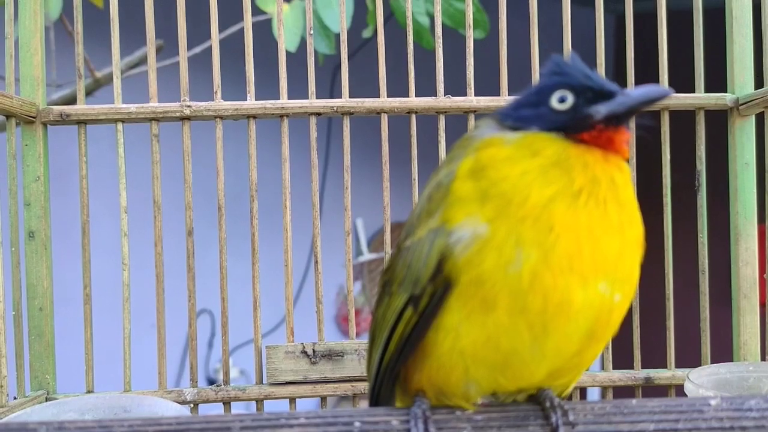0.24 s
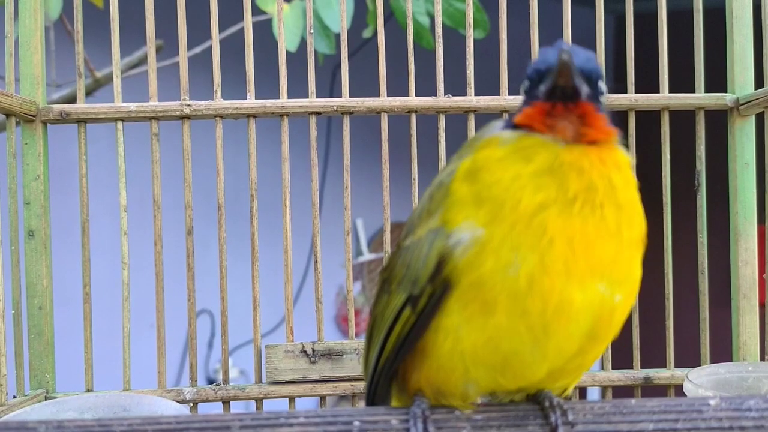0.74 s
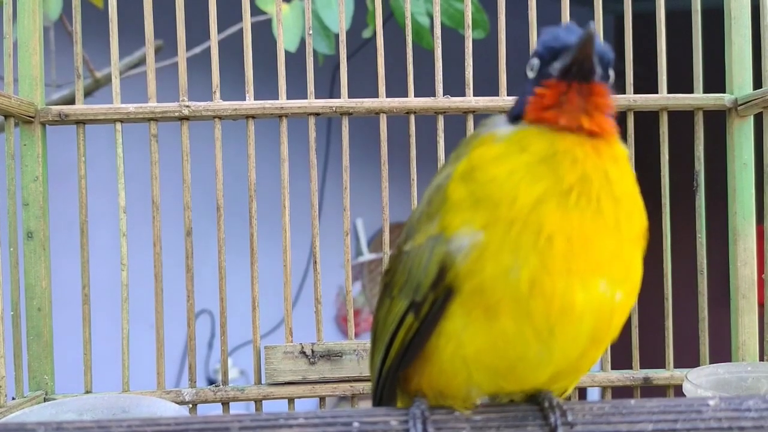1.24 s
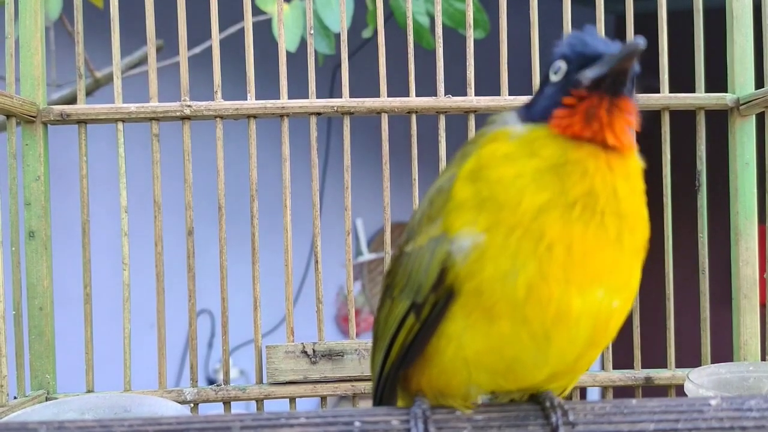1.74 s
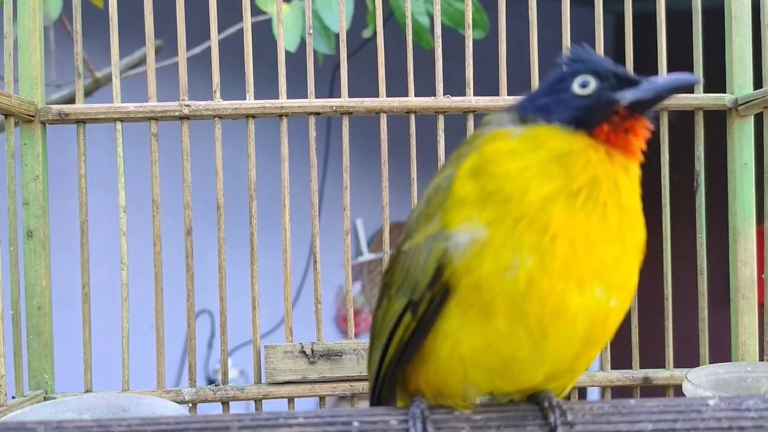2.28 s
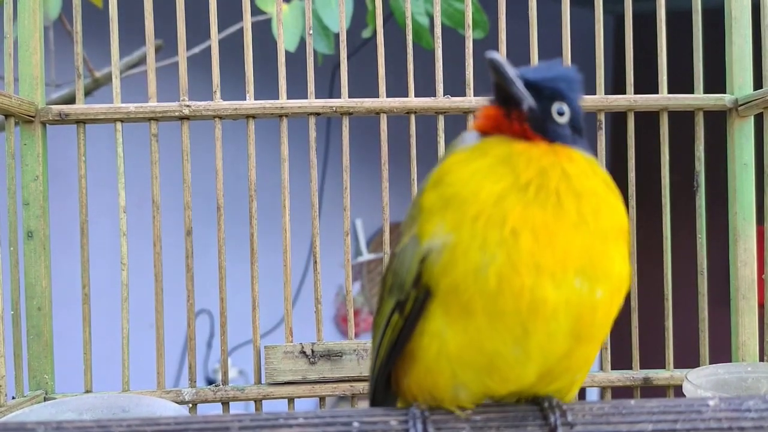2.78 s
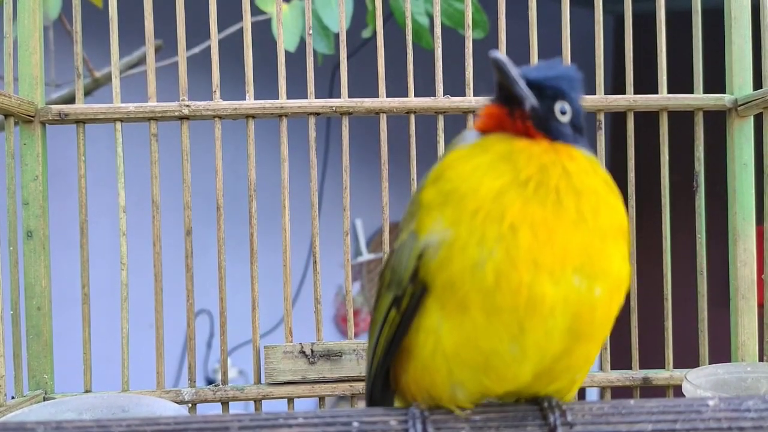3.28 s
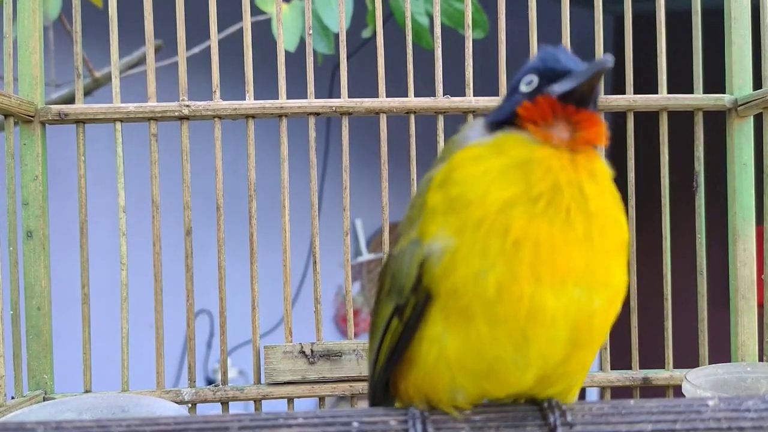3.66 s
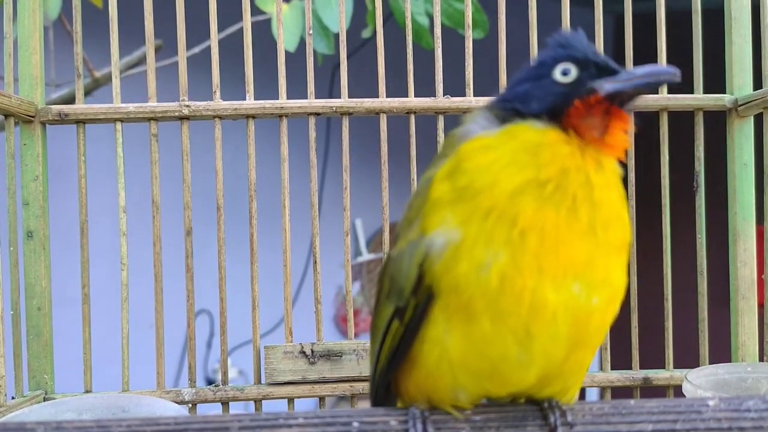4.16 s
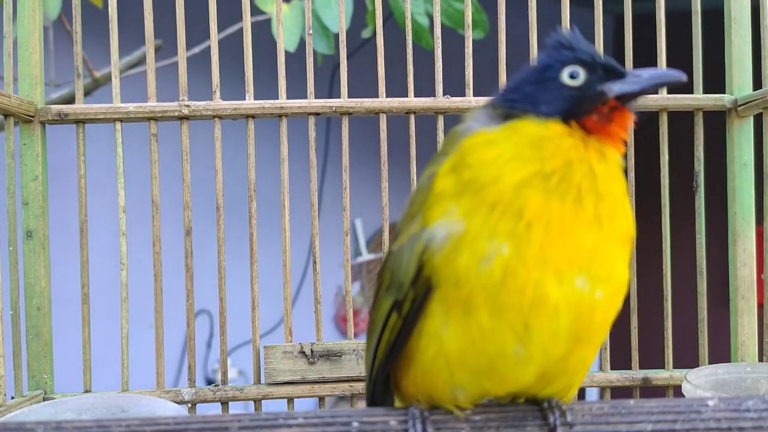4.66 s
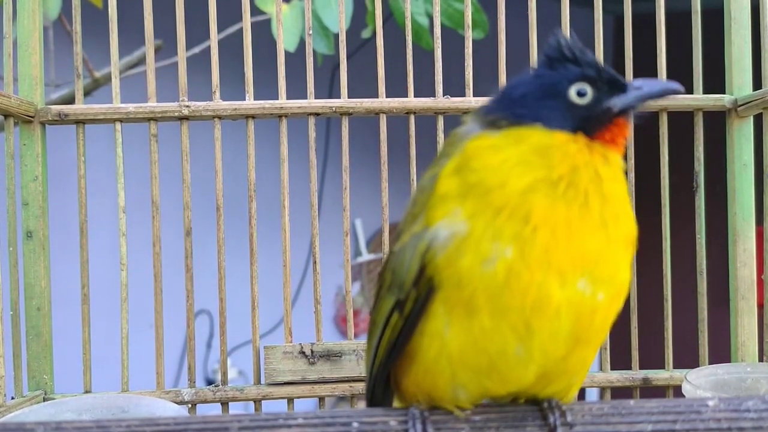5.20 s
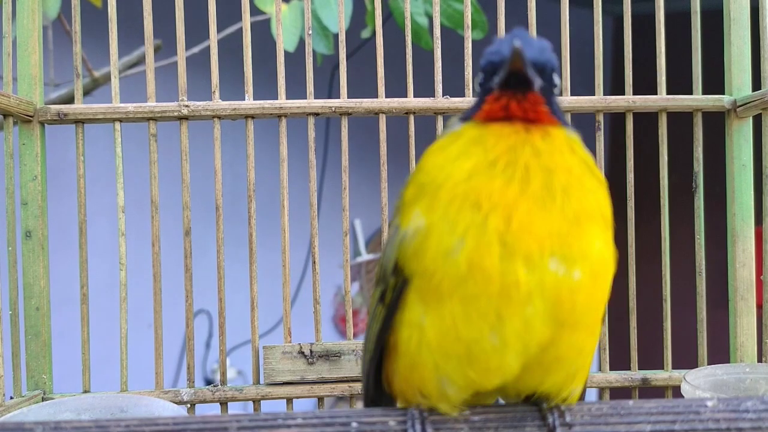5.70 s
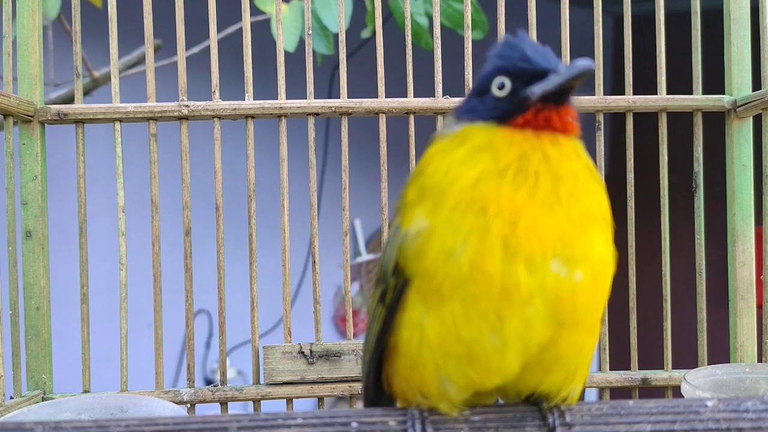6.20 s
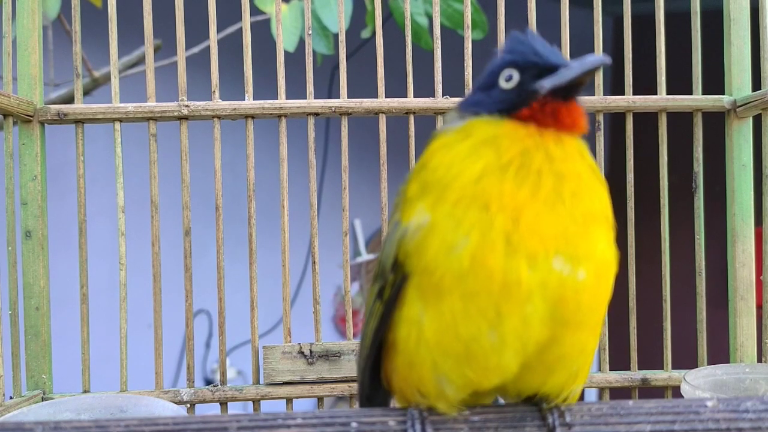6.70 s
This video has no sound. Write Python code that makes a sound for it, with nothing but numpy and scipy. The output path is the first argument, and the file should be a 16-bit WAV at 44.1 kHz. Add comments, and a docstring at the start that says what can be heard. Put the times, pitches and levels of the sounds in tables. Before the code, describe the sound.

Bright, pure bird whistles burst out in two short matching phrases, with low distant traffic between them and a sharp, clipped new start at the end.

```python
"""Caged bulbul, close up

A bulbul in a cane cage sings two quick phrases of chips, a slur, a pip, a long whistle and loud twirls,
then starts a third with a squeak and two yelps. Each note is a nearly pure gliding whistle with faint
overtones, a scratchy onset, patchy noise that follows its level, and a short echo from the walls.
Swells of filtered noise make soft feather rustles, traffic, far-off hums and hiss; the perch taps once."""
import sys
import numpy as np
from scipy import signal
from scipy.fft import rfft, irfft, next_fast_len
from scipy.io import wavfile
from scipy.ndimage import uniform_filter1d

SR = 44100
rng = np.random.default_rng(int(sys.argv[2]) if len(sys.argv) > 2 else 0)


def unload_wav(signal):
    """Save mono or channel-first audio to the path in sys.argv[1] as 16-bit WAV at rate SR, clipped to [-1, 1]."""
    wavfile.write(
        sys.argv[1],
        SR,
        np.round(np.clip(np.atleast_2d(signal).T, -1, 1) * 32767).astype(np.int16),
    )


N = 306054
TIME = np.arange(N) / SR   # s


def from_db(db):
    """Decibels to amplitude gain."""
    return 10 ** (np.asarray(db) / 20)


def rms_one(x):
    """Scale to unit power."""
    return x / np.sqrt(np.mean(x ** 2) + 1e-20)


def over_time(points):
    """Draw a curve through (time, value) breakpoints."""
    return np.interp(TIME, *np.transpose(points))


def at_hz(points, hz):
    """Read a (frequency, value) curve on a log-frequency axis."""
    f, value = np.transpose(points)
    return np.interp(np.log(np.maximum(hz, 1)), np.log(f), value)


def colour(x, gain_at):
    """Filter by a gain that is a function of frequency."""
    length = x.shape[-1]
    size = next_fast_len(length + 4096)
    hz = np.arange(size // 2 + 1) * SR / size
    return irfft(rfft(x, size) * gain_at(hz), size)[..., :length]


def flutter(rate_hz):
    """Random wander, mostly slower than the given rate; spread 1."""
    return rms_one(colour(rng.standard_normal(N), lambda hz: 1 / (1 + (hz / rate_hz) ** 2)))


def hiss(spectrum):
    """Mono noise of the given colour at unit power."""
    return rms_one(colour(rng.standard_normal(N), lambda hz: from_db(at_hz(spectrum, hz))))


def patchy(x, depth_db, size=1024):
    """Narrow bands swell and fade slowly, each wandering nearly on its own."""
    bins = signal.stft(x, nperseg=size)[2]
    field = uniform_filter1d(rng.standard_normal(bins.shape[-2:]), size=3, axis=0)   # across frequency
    field = rms_one(uniform_filter1d(field, size=30, axis=1))   # across time
    return signal.istft(bins * from_db(depth_db * field), nperseg=size)[1][..., :x.shape[-1]]


# How alike the two ears are: (frequency [Hz], left-right correlation [-1 to 1])
EAR_LIKENESS = [(30, 1), (100, .97), (200, 0.94), (350, 0.57), (700, 0.0044), (1500, 0.16), (16000, 0.02)]


def likeness(hz):
    """Left-right correlation of background noise at a frequency."""
    return np.clip(at_hz(EAR_LIKENESS, hz), -.99, .99)


def ambience(spectrum):
    """Coloured stereo noise from a shared part and an opposed part, alike in both ears in the bass."""
    mid, side = rng.standard_normal((2, N))
    mid = colour(mid, lambda hz: from_db(at_hz(spectrum, hz)) * np.sqrt(1 + likeness(hz)))
    side = colour(side, lambda hz: from_db(at_hz(spectrum, hz)) * np.sqrt(1 - likeness(hz)))
    return np.array([mid + side, mid - side])


def swells(rows, grain_db):
    """Bell-shaped swells of noise, each around one frequency; low ones are alike in both ears."""
    out = np.zeros((2, N))
    for centre_s, half_s, centre_hz, octaves, db in rows:
        on = np.abs(TIME - centre_s) < 3 * half_s
        band = lambda hz: 1 / (1 + (np.log2((hz + 1) / centre_hz) / octaves) ** 2) ** 2
        mid, side = colour(rng.standard_normal((2, N))[:, on], band)
        alike = likeness(centre_hz)
        noise = rms_one(np.sqrt(1 + alike) * mid + np.sqrt(1 - alike) * side * [[1], [-1]])
        bell = np.exp(-((TIME[on] - centre_s) / half_s) ** 2)
        out[:, on] += from_db(db) * noise * bell
    return out * from_db(grain_db * flutter(60))


# Colour of the surrounding hiss: (frequency [Hz], relative level [dB])
AIR_COLOUR = [(400, -7), (800, -4.5), (1050, 1), (1400, -3), (2000, -12.5), (3000, -21), (4500, -26.5),
              (8000, -25.5), (11000, -33), (15500, -32.5)]
# Its loudness: (time [s], level [dB])
AIR_LEVEL = [(0, -59.5), (2.2, -64), (3.2, -64.5), (4.8, -63), (5.7, -67.5), (6.94, -63.5)]


def air():
    """Faint hiss of the surroundings: stereo noise whose narrow bands waver."""
    return from_db(over_time(AIR_LEVEL)) * rms_one(patchy(ambience(AIR_COLOUR), depth_db=6.5))


# Faint hums and tones: (time [s], half length [s], centre [Hz], width [octaves], peak level before grain [dB])
FAR_HUMS = [(.35, 0.32, 1660, .03, -66), (.6, .9, 93, 0.06, -51.5), (6.4, 0.5, 90.3, 0.038, -50.5),
            (1.2, .9, 349.7, .05, -48), (1.7, 0.67, 244.6, .03, -50), (2.3, 0.071, 987, 0.015, -54.5),
            (2.95, .45, 1512, .06, -67), (3.3, 1.4, 554.6, 0.059, -58.5), (5.2, 0.32, 1262, 0.12, -65.5),
            (5.4, 0.29, 2740, .12, -74), (6.58, 0.25, 3400, 0.0295, -76.5)]


def far_tones():
    """Far-off hums and tones as swells of narrow-band noise."""
    return swells(FAR_HUMS, grain_db=1.0)


# Nearer traffic: (time [s], engine level before trim [dB], tyre level before trim [dB])
TRAFFIC_LEVEL = [(0, -42.5, -50.5), (2.2, -41, -49.5), (2.9, -50, -58.5), (3.7, -42, -58.5),
                 (4.7, -43.5, -57.5), (5.3, -37, -59), (5.74, -46, -67.5), (5.86, -59, -69),
                 (6.6, -62, -70.5), (6.94, -55.5, -65)]
# Colour inside the traffic bands: (frequency [Hz], relative level [dB])
TRAFFIC_TONE = [(20, -29.5), (35, -19.5), (60, -9.5), (88, 0), (130, -1), (190, -4.5), (250, -3.5),
                (340, -11), (440, -20.5), (560, -16), (680, -19.5), (850, -34), (1100, -36)]


def traffic(rumble_db=-44.5, engine_trim_db=-1.15, tyre_trim_db=0.5):
    """A steady low town rumble, with engine and tyre noise that swell and fade above it."""
    time_s, engine_db, tyre_db = np.transpose(TRAFFIC_LEVEL)
    engine = np.interp(TIME, time_s, engine_db) + engine_trim_db
    tyres = np.interp(TIME, time_s, tyre_db) + tyre_trim_db
    noise, out = ambience(TRAFFIC_TONE), 0
    for band_hz, db in [((15, 140), rumble_db), ((140, 400), engine), ((400, 900), tyres)]:
        bandpass = signal.butter(4, band_hz, "band", fs=SR, output="sos")
        part = signal.sosfiltfilt(bandpass, noise, padtype="even")
        out = out + rms_one(part) * from_db(db)
    return out


# Feather rustles and other soft swells of hiss:
# (time [s], half length [s], centre [Hz], width [octaves], peak level before grain and patchiness [dB])
FEATHER_RUSTLES = [(.66, 0.11, 8000, .21, -68.5), (.84, 0.04, 4440, 0.044, -32), (.86, .09, 8050, .39, -54),
                   (.96, .12, 4257, 0.021, -51), (.94, 0.12, 4940, .09, -44.5),
                   (1.02, 0.11, 6260, 0.071, -52.5), (3.08, 0.1, 4160, 0.68, -77.5),
                   (4.07, .054, 3890, .83, -46), (4.683, .14, 8000, 0.086, -72),
                   (5.821, 0.12, 7800, 0.44, -65), (5.976, .2, 6830, .6, -68), (5.9, .22, 2870, 1, -68.5),
                   (6.545, 0.081, 5500, .7, -70.5), (6.56, .08, 2090, 0.59, -64)]


def feathers():
    """Feathers rustle as the bird moves: grainy, patchy swells of band-limited noise."""
    return patchy(swells(FEATHER_RUSTLES, grain_db=1.5), depth_db=3.5)


def perch(tap_s=5.776, onset_db=-47, decay_s=0.0044, corner_hz=700):
    """One soft, dull tap of decaying low noise as the bird shifts on its perch."""
    since = TIME - tap_s
    thud = rms_one(colour(rng.standard_normal(N), lambda hz: 1 / (1 + (hz / corner_hz) ** 2)))
    return from_db(onset_db) * thud * (since > 0) * np.exp(-np.abs(since) / decay_s)


# Distinct echoes off nearby walls: (delay [s], level before wall colour [dB])
WALL_ECHOES = [(0.0127, -31.5), (.0172, -34)]
# Colour of all the echoes: (frequency [Hz], gain [dB])
WALL_COLOUR = [(1000, 4), (2200, 4), (3200, 4.5), (3800, 5.5), (4600, 3), (6000, 6.5), (9000, 7),
               (15000, 1)]


def walls(x, near_db=-27, near_t60=.14, far_db=-35, far_t60=0.64, gap_s=0.001):
    """Two distinct echoes, dense early reflections and a fainter, longer tail; decay times in s."""
    t = np.arange(SR) / SR
    response = 0
    for db, t60 in (near_db, near_t60), (far_db, far_t60):
        fade_in = np.clip(t / gap_s - 1, 0, 1)   # silent during the gap
        echoes = rng.standard_normal((2, SR)) * from_db(-60 * t / t60) * fade_in
        response = response + from_db(db) * rms_one(echoes) / np.sqrt(SR)
    for delay_s, db in WALL_ECHOES:
        response[:, int(delay_s * SR)] += from_db(db)
    response = colour(response, lambda hz: from_db(at_hz(WALL_COLOUR, hz)))
    return signal.fftconvolve(x[None], response, axes=1)[:, :N]


def sing(shape, rows, flick_share=.22):
    """Stretch, transpose and swell one gesture per row into (time s, Hz, dB) paths; the end flicks."""
    share, hz, db = np.transpose(shape)
    closing = np.clip(1 - (1 - share) / flick_share, 0, 1)   # the pitch bend grows over the last part
    notes = []
    for start_s, length_s, semitones, level_db, crescendo_db, flick in rows:
        time_s = start_s + length_s * share
        pitch_hz = hz * 2 ** ((semitones + flick * closing) / 12)
        note_db = db + level_db + crescendo_db * (share - .5)
        notes.append(np.transpose([time_s, pitch_hz, note_db]))
    return notes


# Overtones 2 to 6 against the fundamental, before the trims below: (level [dB])
OVERTONE_LEVELS = [-33, -39, -42, -47, -54.5]
# Extra level of the octave overtone: (time [s], gain [dB])
OCTAVE_GAIN = [(.8, -3.5), (1.2, -3), (1.7, -3), (3.5, 1.5), (3.8, 7.5), (4.0, -0.5), (4.4, -1.5), (6.9, 5)]
# How throat and open beak colour the overtones: (frequency [Hz], gain [dB])
BEAK_COLOUR = [(4000, -1), (5500, -2), (7000, -2.5), (8300, 11), (9500, -2), (11000, -3.5), (12200, -3),
               (14000, 6), (16000, -2.5)]
# Patchy noise around the notes: (frequency [Hz], relative level [dB])
HALO_COLOUR = [(700, -7), (1200, 6), (1800, 1.5), (2600, 10), (4000, 11), (6000, -3.5), (7000, -5.5),
               (8500, 0), (11000, -13.5), (14500, -5), (16000, -10.5)]
# Scratch before the tone locks in: (frequency [Hz], relative level [dB])
SCRATCH_COLOUR = [(600, -35.5), (1200, 3.5), (1900, 3.5), (3000, -2), (4500, -23.5), (9000, -27),
                  (15000, -37.5)]


def syrinx(notes, overtone_db, halo_db, scratch_db, scratch_s=.004, edge_s=0.0012,
           jitter=.003, shimmer_db=0.56, half_db=-40, waver_db=2.5):
    """One oscillator glides through each note, with a scratch at its start and a halo of patchy noise."""
    pitch, level, start = np.full(N, 2500.), np.zeros(N), np.zeros(N)
    for note in notes:
        s, hz, db = np.transpose(note)
        on = slice(*np.searchsorted(TIME, [s[0] - 3 * scratch_s, s[-1] + 2 * edge_s]))
        t = TIME[on]
        gate = np.clip(np.minimum(t - s[0], s[-1] - t) / edge_s + 1, 0, 1)
        pitch[on] = np.interp(t, s, hz)
        level[on] = gate * from_db(np.interp(t, s, db))
        start[on] = np.exp(-((t - s[0]) / scratch_s) ** 2)
    # smooth the corners, then add small random pitch and level wander
    pitch = uniform_filter1d(pitch, size=40) * (1 + jitter * flutter(360))
    level = np.abs(uniform_filter1d(level, size=30)) * from_db(shimmer_db * flutter(100))

    phase = 2 * np.pi * np.cumsum(pitch) / SR
    tone = np.sin(phase) + from_db(half_db) * np.sin(phase / 2)   # alternate cycles differ slightly
    singing = level > 1e-5
    for k, db in enumerate(OVERTONE_LEVELS, 2):
        hz = k * pitch[singing]
        waver = from_db(overtone_db + waver_db * flutter(30))[singing]
        if k == 2:
            db = db + over_time(OCTAVE_GAIN)[singing]
        gain = from_db(db + at_hz(BEAK_COLOUR, hz)) * waver
        tone[singing] += gain * np.sin(k * phase[singing]) * (hz < SR / 2)

    follow = level ** .6 * (pitch / 3000) ** .8   # the noise is stronger on loud, high notes
    halo = from_db(halo_db) * follow * patchy(hiss(HALO_COLOUR), depth_db=8, size=256)
    scratch = from_db(scratch_db) * start * hiss(SCRATCH_COLOUR)
    return np.sqrt(2) * level * tone + halo + scratch


# Gesture of each kind of note: (share of its length [0-1], pitch [Hz], level [dB]),
# before each sung note's transposition and level
CHIP_GESTURE = [(0.0, 2193, -18.5), (0.057, 2020, -3), (0.189, 2950, -0.17), (0.669, 3358, -0.35),
                (1.0, 3563, -23)]
SLUR_GESTURE = [(0.0, 2281, -17), (0.035, 2148, -0.6), (0.063, 2716, -4.5), (0.464, 2450, 0.3),
                (0.668, 2732, -2.5), (0.823, 2767, 2), (0.942, 2760, 0.5), (1.0, 2600, -16.5)]
PIP_GESTURE = [(0.0, 2410, -22), (0.093, 3363, -17), (0.46, 3493, 0.16), (0.807, 3563, -2.34),
               (1.0, 3410, -22.5)]
WHISTLE_GESTURE = [(0, 2260, -20.5), (.047, 2870, 0), (.228, 2535, -3), (.52, 2411, 2), (.61, 2280, 0.6),
                   (.71, 2240, 1.1), (.84, 2205, 2), (.935, 2274, 0.5), (1, 2373, -23.5)]
TWIRL_GESTURE = [(0, 2313, -22.5), (.08, 3018, -6.5), (.21, 3001, -0.7), (.335, 3316, -1.4),
                 (.4, 2340, -11), (.46, 2030, -14), (.61, 2175, -11.5), (.69, 3430, 0), (.73, 3828, -8.5),
                 (.785, 3770, -6), (.88, 4576, -8.5), (1, 4977, -27.5)]
SQUEAK_GESTURE = [(0, 3700, -27.5), (.22, 2900, -10.5), (.68, 2170, 1), (1, 1750, -7)]
YELP_GESTURE = [(0.0, 2060, -12.5), (0.205, 2858, -8.5), (0.332, 3130, -1.5), (0.707, 2939, -2.1),
                (1.0, 2548, -17)]
# Notes sung: (start [s], length [s], transposition [semitones], level added to the gesture [dB],
# crescendo from start to end [dB], closing flick [semitones])
CHIP_NOTES = [(0.7406, 0.033, -0.073, -14, 1.27, -0.1), (0.823, 0.037, -0.08, -13.0, -2.5, -0.28),
              (3.483, 0.0347, 0.37, -15, 2, 0.1), (3.5683, 0.034, 0.076, -14.5, -11, -1.43)]
SLUR_NOTES = [(0.9037, 0.0976, -0.12, -11.5, 0.5, 0.2), (3.647, 0.11, 0.097, -11.5, -1.5, -0.7)]
PIP_NOTES = [(1.055, 0.0402, 0.1, -8.5, 4, 0.97), (3.813, 0.0419, 0.05, -11.5, -2.5, -0.9)]
WHISTLE_NOTES = [(1.1336, .131, -.1, -7.5, -2.9, .1), (3.8952, .139, .05, -8.5, 3, 3.4)]
TWIRL_NOTES = [(1.4372, 0.056, -.15, -1.26, 2, -0.7), (1.5321, 0.058, .11, -2.2, -2, 1.5),
               (1.6344, .057, .28, -6, -0.8, 1.8), (4.1486, .0585, -.1, -6, -1.5, 0),
               (4.244, 0.06, .4, -6, -5.5, -0.94), (4.3446, .06, .45, -4.5, 1, -2.6),
               (4.452, .059, -.45, -8.5, 2, 1)]
SQUEAK_NOTES = [(6.8485, .0185, .05, -13.5, -2, .1)]
YELP_NOTES = [(6.8837, 0.017, 0.2, -4.5, -4, 0.26), (6.9172, 0.018, 0.18, 0.18, 1, 2.3)]
# The head's aim: (time [s], left gain against right, before shading [dB])
HEAD_AIM = [(.75, -3.5), (.85, -4.5), (.95, -3), (1.2, -2.5), (1.55, -2.5), (3.5, -3), (3.7, -5.5),
            (3.84, -2), (4.0, -4.5), (4.45, -3.5), (6.92, -3.5)]
# Shading of the far, left side: (frequency [Hz], gain [dB])
LEFT_SHADE = [(1000, -4.5), (1600, -4.5), (2300, -1), (2750, -10.5), (3150, -1), (3600, -4.5),
              (4000, -14.5), (4600, -2.5), (5500, 3), (7000, -15), (8200, -26.5), (11000, -15),
              (15000, -7.5)]


def bird(left_lag_s=.000306, yelp_echo_db=7):
    """The bird sits to the right: the left side hears it later and shaded. The yelps stir more echo."""
    opening_notes = sing(CHIP_GESTURE, CHIP_NOTES) + sing(SLUR_GESTURE, SLUR_NOTES)
    opening_notes += sing(PIP_GESTURE, PIP_NOTES) + sing(WHISTLE_GESTURE, WHISTLE_NOTES)
    twirl_notes = sing(TWIRL_GESTURE, TWIRL_NOTES)
    yelp_notes = sing(SQUEAK_GESTURE, SQUEAK_NOTES) + sing(YELP_GESTURE, YELP_NOTES)

    opening = syrinx(opening_notes, overtone_db=3, halo_db=-48.5, scratch_db=-30.5, scratch_s=0.0046)
    twirls = syrinx(twirl_notes, overtone_db=-5.5, halo_db=-31, scratch_db=-34)
    yelps = syrinx(yelp_notes, overtone_db=-6.5, halo_db=-33, scratch_db=-32)

    song = opening + twirls + yelps
    lag = lambda hz: np.exp(-2j * np.pi * hz * left_lag_s)
    left = colour(song, lambda hz: from_db(at_hz(LEFT_SHADE, hz)) * lag(hz))
    left *= from_db(over_time(HEAD_AIM))
    return np.array([left, song]) + walls(opening + twirls + from_db(yelp_echo_db) * yelps)


def scene():
    """Layer the hiss, hums, traffic, feathers and perch under the bird."""
    return air() + far_tones() + traffic() + feathers() + perch() + bird()


def record(dry, ceiling=0.98, cutoff_hz=16000):
    """The loudest notes overload the near microphone and flatten at the ceiling; the top is cut."""
    lowpass = signal.cheby2(16, 60, cutoff_hz + 600, fs=SR, output="sos")   # 60 dB down at the edge
    return signal.sosfilt(lowpass, np.clip(dry, -ceiling, ceiling))


dry = scene()
out = record(dry)
unload_wav(out)
```